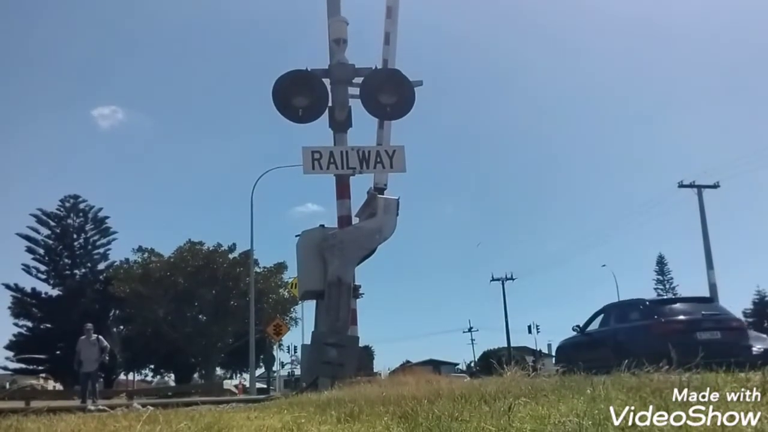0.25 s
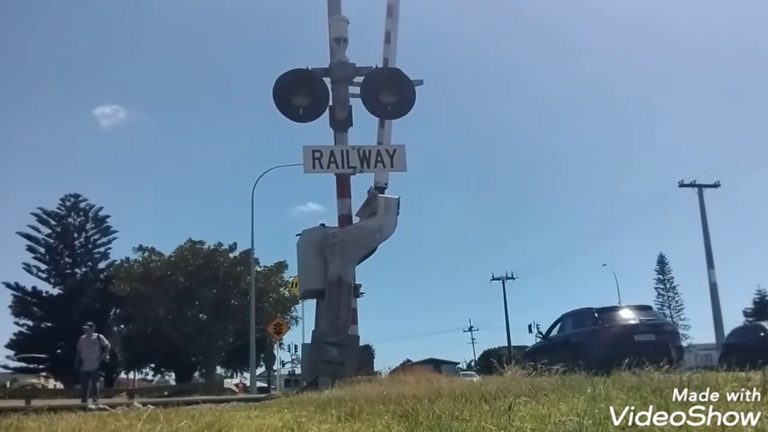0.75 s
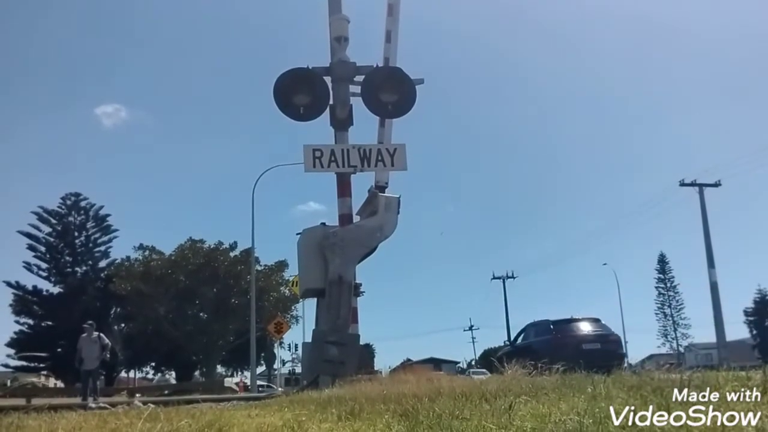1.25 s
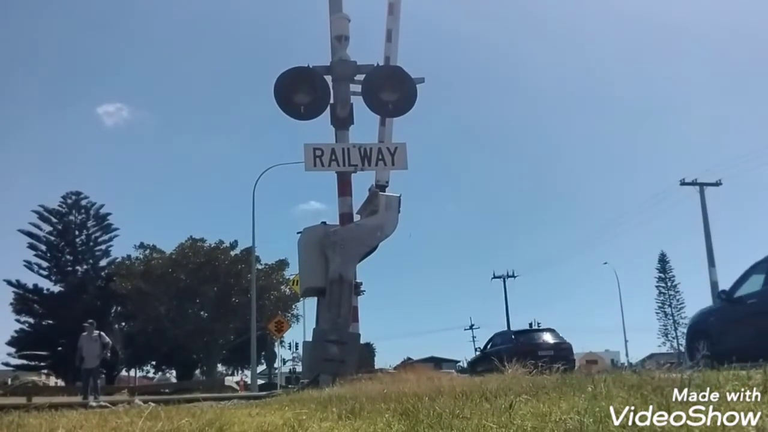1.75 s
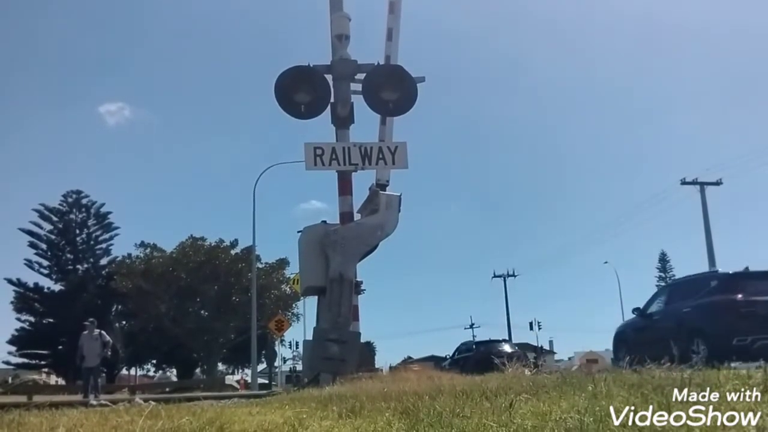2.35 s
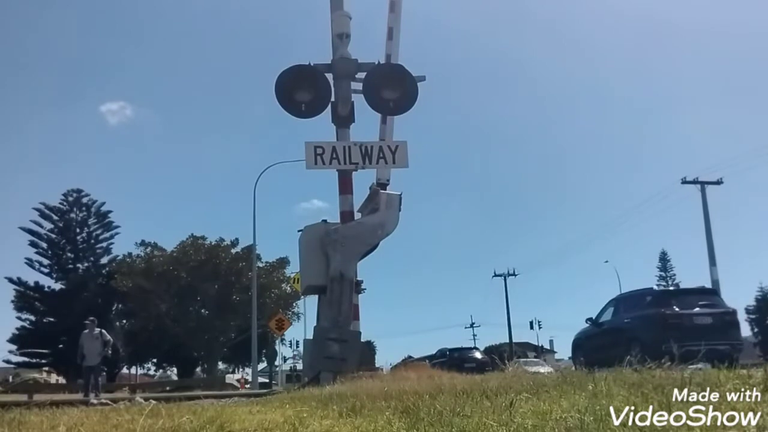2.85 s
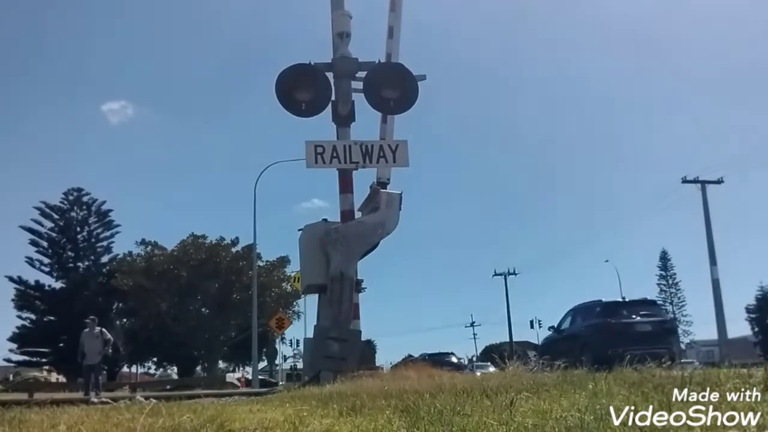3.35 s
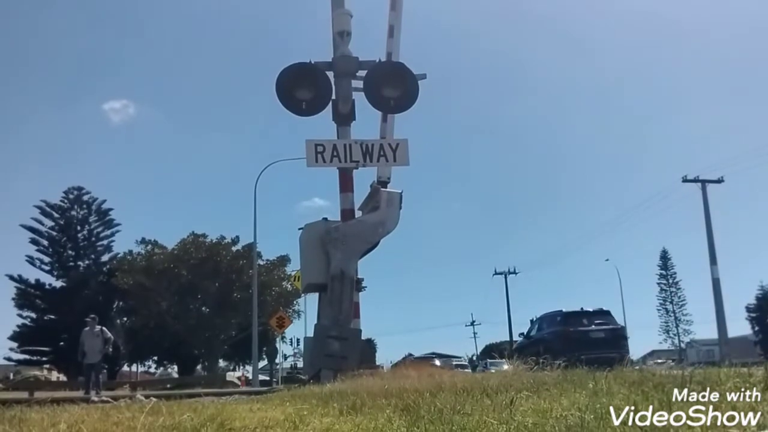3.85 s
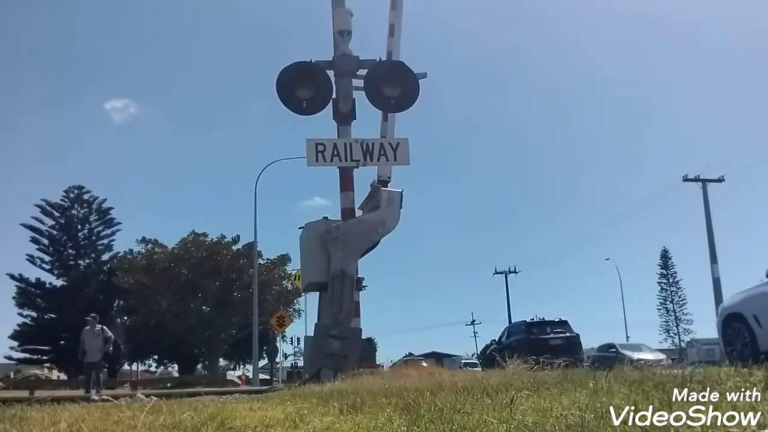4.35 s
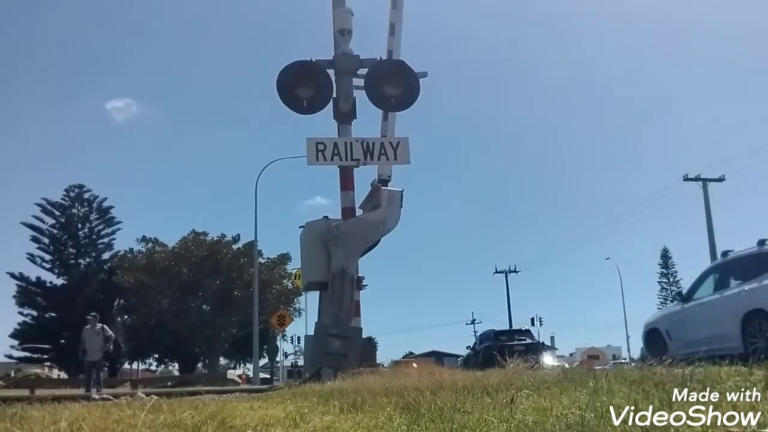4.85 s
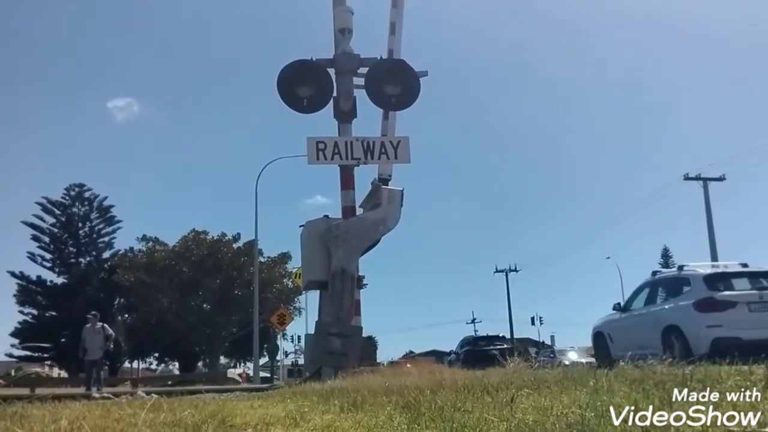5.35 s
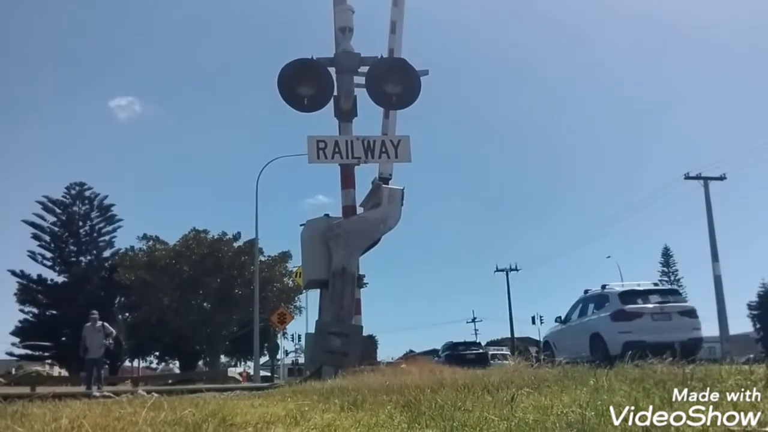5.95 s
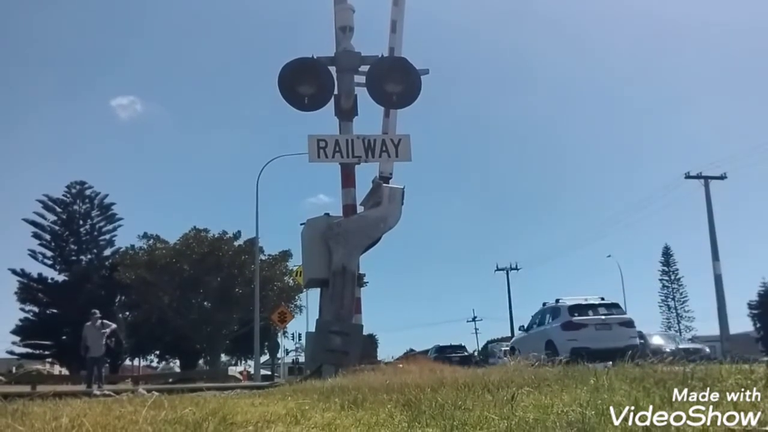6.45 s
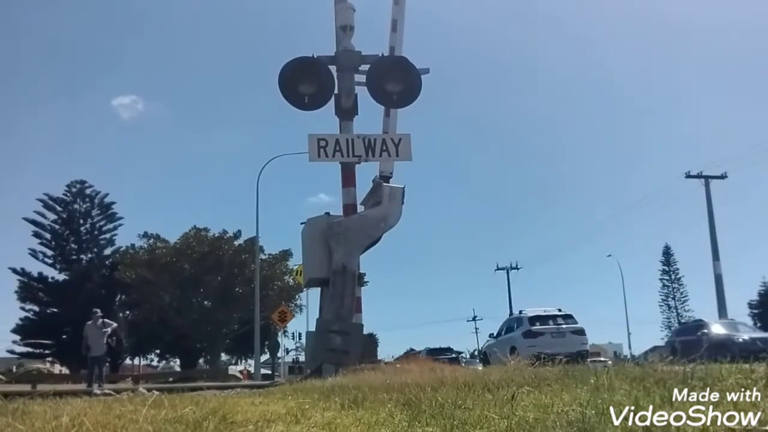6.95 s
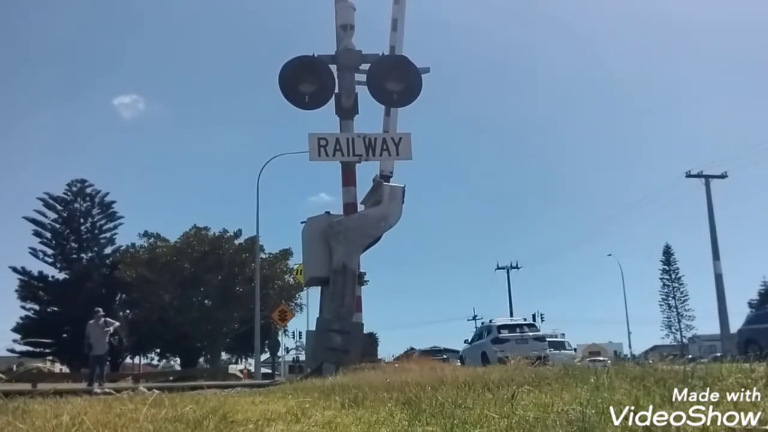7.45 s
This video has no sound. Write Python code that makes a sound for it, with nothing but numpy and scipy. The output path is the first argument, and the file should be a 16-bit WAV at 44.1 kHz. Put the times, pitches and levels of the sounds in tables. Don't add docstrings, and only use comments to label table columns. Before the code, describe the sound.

Cars roll slowly over a bumpy crossing as hoarse sparrows chirp and insects hiss, then one big engine revs up deep and drops back.

```python
import sys
import numpy as np
from scipy import signal
from scipy.fft import rfft, irfft
from scipy.io import wavfile
from scipy.ndimage import uniform_filter1d

SR = 44100
rng = np.random.default_rng(int(sys.argv[2]) if len(sys.argv) > 2 else 0)


def dump(signal):
    limited = np.clip(np.atleast_2d(signal).T, -1, 1)
    pcm = np.round(limited * 32767).astype(np.int16)
    wavfile.write(sys.argv[1], SR, pcm)


def gain_from_db(level_db):
    decades = np.asarray(level_db, float) / 20
    return 10 ** decades


N = 338688
HZ = np.arange(N // 2 + 1) * SR / N + 1e-3
TIME = np.arange(N) / SR


def level(x, db):
    return x * gain_from_db(db) / np.sqrt(np.mean(x ** 2))


def across(table, column):
    rows = np.array(table, float)
    return np.interp(np.log(HZ), np.log(rows[:, 0]), rows[:, column])


def curves(table):
    s, *columns = np.transpose(table)
    return [np.interp(TIME, s, c) for c in columns]


def walk(rate):
    hold = int(SR / rate)
    steps = np.repeat(rng.standard_normal(N // hold + 1), hold)
    return 1.3 * uniform_filter1d(uniform_filter1d(steps, hold), hold)[:N]


def resonance(hz, width):
    return 1j * HZ * width / (hz ** 2 - HZ ** 2 + 1j * HZ * width)


def ports(shared, other):
    # (frequency [Hz], left minus right [dB], coherence [0-1])
    port_response = [(60, 2.5, .99), (303, 4.5, 1), (700, 2.5, 0.91), (2210, 2.5, 0.56), (3170, 2, 0.75),
                     (4400, -2.5, 0), (5840, -10.5, 0), (6900, -7, 0.54), (8140, -1, 0.8), (9200, 2.5, 1),
                     (10700, 3, 0.82), (13000, 15, 0.8), (15500, 19, 0.5)]
    lag_s, lag_top_hz = 0.00023, 4950
    like = np.clip(across(port_response, column=2), 0, 1)
    tilt = gain_from_db(across(port_response, column=1) / 2)
    lag = np.exp(-2j * np.pi * HZ * lag_s * (HZ < lag_top_hz))
    left = shared * lag * tilt
    right = (like * shared + np.sqrt(1 - like ** 2) * other) / tilt
    return np.array([left, right]) * 2 / (tilt + 1 / tilt)


def wash(colour, db, anchors_hz, levels_db, flicker_db, flicker_rate, step):
    low, high = np.log2([colour[0][0], colour[-1][0]])
    pair = ports(*rfft(rng.standard_normal((2, N)))) * gain_from_db(across(colour, column=1))
    pair = pair * gain_from_db(db) / np.sqrt(2 * np.sum(abs(pair.mean(axis=0)) ** 2) / N ** 2)
    swells = np.array([v - 10 * np.log10(np.mean(gain_from_db(2 * v))) for v in levels_db])
    out = 0
    for octave in np.arange(low, high + step, step):
        window = np.clip(1 - abs(np.log2(HZ) - octave) / step, 0, 1)
        share = [np.interp(octave, np.log2(anchors_hz), one) for one in np.eye(len(anchors_hz))]
        swell_db = share @ swells + flicker_db * walk(flicker_rate)
        out = out + gain_from_db(swell_db) * irfft(pair * window, N)
    return out


def streaks(x, depth_db, width_hz, hold_s):
    size = 1024
    cells = signal.stft(x, nperseg=size)[2]
    field = rng.standard_normal(cells.shape[1:])
    field = uniform_filter1d(field, max(int(width_hz * size / SR), 1), axis=0)
    field = uniform_filter1d(field, max(int(hold_s * 2 * SR / size), 1), axis=1)
    return signal.istft(cells * gain_from_db(depth_db * field / field.std()), nperseg=size)[1][:, :N]


def heat():
    # (time [s], low choir [dB], high choir [dB], leaves [dB])
    heat_swells = [(0.0, -65, -59, -59.5), (0.36, -61, -61, -61), (0.9, -64.5, -63, -61),
                   (1.11, -59, -59, -57), (1.84, -59, -56, -53), (1.99, -63, -60, -61),
                   (2.2, -61.5, -55.5, -57), (2.27, -58, -53.5, -58), (2.46, -60.5, -59, -59.5),
                   (2.57, -58.5, -54.5, -62), (2.69, -59.5, -60, -65.5), (3.04, -65.5, -58, -66),
                   (3.21, -69.5, -68.5, -69), (3.29, -60, -56, -56.5), (3.36, -63.5, -57, -59),
                   (3.42, -61.5, -56, -65), (3.72, -57.5, -57, -58.5), (4.04, -63, -56, -66),
                   (4.51, -68, -69, -74), (4.56, -70, -68, -70.5), (4.62, -66, -62, -54),
                   (4.66, -72, -63, -66), (4.77, -60, -68, -71), (5.05, -73.5, -68.5, -73),
                   (5.13, -70, -68.5, -73.5), (5.2, -69, -66.5, -63.5), (5.37, -66, -63.5, -74.5),
                   (5.88, -65, -68.5, -68.5), (6.05, -63.5, -65.5, -59.5), (6.59, -62, -62, -69),
                   (6.61, -57, -65, -65), (6.74, -61, -61, -63), (7.42, -59, -63.5, -71),
                   (7.68, -57, -66.5, -70)]
    # (frequency [Hz], density [dB per Hz])
    hiss_spectrum = [(1350, -14), (2300, -6.5), (2570, -2), (2810, -8.5), (3350, -4.5), (4170, -8.5),
                     (4370, -3), (4970, -3.5), (6080, 3.5), (6530, 0.5), (7130, 1.5), (7980, -2.5),
                     (10900, 1), (13900, -3), (15700, -7)]
    hiss = wash(hiss_spectrum, -55.3, [6300, 10000, 13500], curves(heat_swells),
                flicker_db=1.7, flicker_rate=40, step=1 / 5)
    return streaks(hiss, depth_db=3.2, width_hz=140, hold_s=.3)


def tree_echoes(song):
    age = TIME[:SR // 2]
    tails = rng.standard_normal((2, len(age))) * np.exp(-age * np.log(1000) / 0.23)
    tails = tails / np.sqrt(np.sum(tails ** 2, axis=1, keepdims=True))
    wet = signal.fftconvolve(song[None], tails, axes=1)[:, :N]
    direct_gain = gain_from_db(np.array([[-2.5], [1.5]]))
    echo_gain = gain_from_db(np.array([[-1.5], [1.5]]))
    return gain_from_db(-0.5) * (song * direct_gain + echo_gain * wet)


def sparrows():
    # (time [s], pitch [Hz], level [dB])
    chirps = [
        [(0.405, 4270, -61), (0.491, 4160, -49), (0.534, 4090, -71)],
        [(0.75, 4420, -68), (0.762, 4410, -57.5), (0.811, 4300, -62)],
        [(0.828, 3460, -65), (0.834, 3470, -58), (0.869, 3740, -64)],
        [(1.048, 4110, -71), (1.054, 4140, -59), (1.091, 4100, -68)],
        [(1.311, 4530, -62.5), (1.319, 4540, -57.5), (1.406, 4220, -65.5)],
        [(1.405, 4140, -62), (1.435, 4370, -60.5), (1.466, 4450, -66)],
        [(1.546, 4280, -65), (1.568, 4280, -59), (1.649, 3930, -65)],
        [(1.668, 4010, -65), (1.684, 3970, -60), (1.735, 3780, -67.5)],
        [(1.884, 4520, -65), (1.928, 4370, -55), (1.971, 3940, -67.5)],
        [(1.974, 3630, -66.5), (1.984, 3650, -58), (2.016, 3670, -65)],
        [(2.442, 4000, -63), (2.516, 3745, -64), (2.57, 4580, -60), (2.608, 3930, -58.5), (2.723, 4350, -65)],
        [(3.115, 4650, -61), (3.161, 4400, -57), (3.283, 3940, -63), (3.321, 3700, -59)],
        [(3.63, 4390, -64), (3.646, 4370, -59), (3.709, 4200, -69)],
        [(3.72, 3660, -68), (3.834, 4280, -48), (3.86, 4060, -65), (3.926, 3620, -60), (3.978, 3750, -66)],
        [(4.288, 4320, -62), (4.306, 4370, -59), (4.363, 4330, -65)],
        [(4.504, 4170, -65), (4.518, 4170, -55), (4.565, 4110, -66)],
        [(4.657, 4870, -63), (4.675, 4910, -56), (4.7, 4900, -68)],
        [(4.713, 3930, -65), (4.719, 3910, -61), (4.752, 3890, -65)],
        [(4.751, 4140, -65), (4.761, 4110, -60), (4.794, 3780, -64)],
        [(4.907, 4120, -66), (4.935, 4120, -50), (4.974, 4100, -73)],
        [(5.3, 4340, -64), (5.336, 4290, -55), (5.375, 3910, -66)],
        [(5.48, 4570, -60), (5.548, 4060, -61), (5.58, 3740, -68)],
        [(5.619, 4070, -62), (5.637, 3990, -57), (5.66, 3840, -66)],
        [(5.992, 4150, -65), (6.054, 3720, -59), (6.097, 3790, -67)],
        [(6.256, 4290, -73), (6.27, 4190, -53), (6.34, 3940, -54), (6.414, 3630, -66)],
        [(6.497, 4410, -64.5), (6.521, 4550, -52), (6.615, 3932, -59), (6.664, 4640, -60)],
        [(7.012, 4740, -67), (7.018, 4750, -64), (7.085, 5020, -64)],
        [(7.088, 4485, -65), (7.116, 4480, -58), (7.197, 3870, -63)],
        [(7.635, 4120, -67), (7.653, 4140, -53), (7.68, 4110, -54)],
    ]
    # (time [s], pitch [Hz], level [dB])
    churrs = [
        [(0.382, 3520, -71), (0.504, 3730, -56), (0.535, 3560, -74)],
        [(0.821, 3410, -67), (0.851, 3340, -61), (0.88, 3320, -75)],
        [(1.557, 3720, -68), (1.619, 3530, -66), (1.738, 3450, -66)],
        [(1.931, 3500, -66), (1.981, 3490, -61), (2.033, 3580, -70)],
        [(2.449, 3670, -68), (2.455, 3540, -66), (2.651, 3520, -60.5), (2.752, 3450, -68)],
        [(3.136, 3580, -77), (3.148, 3570, -58.5), (3.358, 3340, -66), (3.374, 3380, -81)],
        [(3.647, 3280, -71), (3.723, 3340, -61), (3.959, 3493, -63.5), (3.993, 3510, -75)],
        [(4.361, 3150, -65), (4.371, 3180, -66), (4.418, 3176, -75)],
        [(4.726, 3700, -69), (4.794, 3680, -66.5), (4.815, 3650, -66)],
        [(4.932, 3570, -80), (4.938, 3480, -63), (5.011, 3130, -67)],
        [(5.343, 3760, -67), (5.385, 3750, -68), (5.402, 3750, -67)],
        [(5.534, 3710, -63), (5.546, 3710, -60.5), (5.583, 3650, -70)],
        [(5.628, 3470, -64), (5.64, 3530, -64), (5.685, 3520, -67)],
        [(6.013, 3640, -64), (6.025, 3640, -61), (6.124, 3480, -70)],
        [(6.273, 3660, -64), (6.315, 3650, -57), (6.469, 3390, -71)],
        [(6.546, 3550, -76), (6.556, 3560, -60), (6.663, 3410, -72)],
        [(7.133, 3670, -69), (7.155, 3640, -62), (7.281, 3470, -74)],
    ]
    song = np.zeros(N)
    trill = signal.sawtooth(2 * np.pi * np.cumsum(34 + 7 * walk(12)) / SR, .75) + .5 * walk(220)
    throb = walk(150)
    hoarse = (1.7 + walk(600)) / 1.9
    for call in chirps + churrs:
        hz, db = curves(call)
        edge = np.clip(np.minimum(TIME - call[0][0], call[-1][0] - TIME) / 0.012 + 1, 0, 1)
        hz = hz + np.clip(.45 * (4550 - hz), 70, 400) * trill
        song += edge * gain_from_db(db + 2.56 * throb) * hoarse * np.sin(2 * np.pi * np.cumsum(hz) / SR)
    return tree_echoes(song)


def scratches(events):
    out = 0
    for s, db, hz, rise, fall in events:
        shape = np.exp(np.minimum((TIME - s) / rise, (s - TIME) / fall))
        scratch = rng.standard_normal((2, N)) * gain_from_db(3.3 * walk(400)) * shape
        out = out + gain_from_db(db + 12) * ports(*rfft(scratch)) * resonance(hz, 0.38 * hz) ** 2
    return irfft(out, N)


def far_swishes():
    # (time [s], level [dB], centre [Hz], rise [s], fall [s])
    swish_events = [
        (4.4, -61, 1400, 0.28, 0.35),
        (4.35, -60, 1350, 0.17, 0.28),
        (7.2, -60, 1500, 0.089, .12),
        (3.7, -70, 2250, 0.24, .3),
        (.25, -60, 1050, .08, .15),
        (2.3, -60, 950, .05, .1),
        (5.62, -52, 560, .08, .15),
    ]
    return scratches(swish_events)


def grass():
    # (time [s], level [dB], centre [Hz], rise [s], fall [s])
    brush_events = [
        (2.064, -55, 13000, .004, .008),
        (2.27, -53, 6700, .01, 0.034),
        (2.37, -52.5, 6500, 0.012, 0.016),
        (3.28, -63.5, 7500, .01, 0.025),
        (4.613, -53, 12300, .007, .012),
        (.455, -62, 5100, .012, .02),
        (3.13, -62, 5000, .015, .02),
        (.89, -64, 4450, .012, .02),
        (5.2, -69, 13000, .01, 0.046),
        (5.75, -58.5, 6040, .005, .02),
    ]
    return scratches(brush_events)


def road():
    # (time [s], thud 30-100 Hz [dB], drone 100-200 Hz [dB])
    rumble = [
        [(0.0, -51, -47.5), (0.63, -51, -57.5), (0.83, -58, -47.5), (1.11, -64.5, -43), (1.59, -61.5, -40),
         (2.63, -56, -50), (3.13, -62.5, -56.5), (4.36, -52.5, -54.5), (4.61, -57, -61), (4.71, -61.5, -51.5),
         (4.92, -59, -61.5), (5.2, -51, -52), (5.82, -57.5, -51), (5.95, -50, -56)],
        [(7.52, -52, -60.5), (7.624, -53, -65), (7.68, -49, -62)],
    ]
    # (time [s], hum 200-450 Hz [dB], roar 450-2500 Hz [dB])
    tyre_swells = [(0.0, -57, -52), (0.06, -40.5, -59.5), (0.1, -52, -57), (0.19, -47.5, -58),
                   (0.43, -47, -53.5), (0.45, -45, -57), (0.64, -42.5, -53), (0.94, -46, -59),
                   (1.03, -48, -54), (1.11, -47, -59.5), (1.69, -48.5, -62.5), (2.39, -52.5, -56),
                   (2.57, -58.5, -64), (2.65, -49.5, -63), (3.01, -58, -61), (3.36, -56, -61.5),
                   (3.61, -59, -53), (3.66, -49, -57.5), (3.89, -54.5, -53), (5.2, -52, -58.5),
                   (5.39, -47.5, -51.5), (6.42, -52.5, -58), (6.46, -38.5, -53), (6.52, -43.5, -58.5),
                   (6.65, -45.5, -60), (7.04, -41.5, -56.5), (7.62, -49, -57), (7.68, -47.5, -52)]
    # (frequency [Hz], density [dB per Hz])
    road_spectrum = [(13, -71), (22, -19.5), (124, 1), (149, -4), (254, -4), (325, -12.5), (376, -13.5),
                     (434, -15), (544, -16), (711, -22.5), (929, -21), (1190, -27.5), (1350, -26.5),
                     (1870, -35.5), (3000, -40.5), (3900, -43), (6600, -120)]
    swells = curves(rumble[0] + rumble[1]) + curves(tyre_swells)
    roar = wash(road_spectrum, -44, [60, 140, 300, 900], swells, flicker_db=1.4, flicker_rate=14, step=1 / 3)
    return streaks(roar, depth_db=3.0, width_hz=90, hold_s=.1)


def rails():
    # (time [s], peak [dB], ring [Hz], decay to -60 dB [s])
    knocks = [(0.034, -49, 510, 0.064), (0.67, -49, 516, 0.07), (1.41, -60, 519, 0.07),
              (1.822, -51, 550, 0.076), (2.189, -50.5, 552, 0.075), (2.407, -46.5, 566, 0.07),
              (3.02, -53, 506, 0.062), (3.569, -51, 478, 0.07), (5.543, -43, 540, 0.07),
              (5.745, -49, 570, 0.07), (5.92, -54, 430, 0.076), (6.124, -43, 876, 0.061),
              (6.452, -44.5, 975, 0.07)]
    out = 0
    for s, db, hz, t60 in knocks:
        age = np.maximum(TIME - s, 0)
        fade = (1 - np.exp(-age / .0007)) * np.exp(-age * np.log(1000) / t60)
        crack = irfft(rfft(rng.standard_normal(N)) * resonance(1.2 * hz, 0.55 * hz) ** 2, N)
        ring = np.sin(2 * np.pi * hz * age)
        out = out + gain_from_db(db + 6) * fade * (ring + level(crack, -6.5))
    return out


def other_engines():
    # (start [s], end [s], start pitch [Hz], end pitch [Hz], level [dB])
    engine_notes = [
        (0.34, 1.13, 262, 250, -45),
        (1.03, 1.46, 365, 390, -51.5),
        (1.5, 2, 420, 385, -62),
        (1.304, 2.64, 122, 119.5, -47.5),
        (1.5, 2, 170, 165, -55),
        (2.3, 3.0, 92, 81, -50),
        (2.88, 4.1, 178, 172.3, -52.5),
        (6.79, 8, 430, 420, -58),
        (6.3, 6.7, 195, 170, -45.5),
        (6.35, 6.6, 270, 240, -50.5),
    ]
    out = 0
    for start, end, start_hz, end_hz, db in engine_notes:
        part = np.clip((TIME - start) / (end - start), 0, 1)
        hz = (start_hz + (end_hz - start_hz) * part) * (1 + 0.01487 * walk(14))
        swell = gain_from_db(db + 2.64 * walk(16)) * np.sin(np.pi * part) ** 0.37
        out = out + swell * np.sin(2 * np.pi * np.cumsum(hz) / SR)
    return out


def big_engine():
    # (time [s], firing rate [Hz], level [dB], octave level [dB])
    rev = [(5.8, 52.1, -63, -57), (5.96, 54.6, -58, -58), (6.04, 52.4, -48, -50), (6.19, 53.85, -43, -46),
           (6.4, 64.1, -32.5, -45), (6.606, 73.94, -26, -34.5), (6.796, 80.1, -25.5, -31.5),
           (6.852, 80.7, -24.5, -40.5), (7.088, 83.2, -27.5, -45.5), (7.202, 78, -28.5, -34),
           (7.6, 55.5, -56.5, -59)]
    # (multiple of the firing rate [1], relative level [dB])
    exhaust = [(.625, -23.5), (0.876, -22), (1.125, -15), (1.375, -11.5), (1.625, -13.5), (1.875, -23),
               (2.375, -26)]
    hz, db, octave_db = curves(rev)
    turns = 2 * np.pi * np.cumsum(hz * (1 + 0.00587 * walk(25))) / SR
    out = gain_from_db(db + .8 * walk(20)) * np.sin(turns)
    out = out + gain_from_db(octave_db + 1.9 * walk(18)) * np.sin(2 * turns + 2.04)
    for multiple, order_db in exhaust:
        line = np.sin(multiple * turns + 2 * np.pi * rng.random())
        out = out + gain_from_db(db + order_db + 3.36 * walk(14)) * line
    edge = np.clip(np.minimum(TIME - rev[0][0], rev[-1][0] - TIME) / 0.14, 0, 1)
    return np.sqrt(2) * edge * out


def scene():
    background = heat() + sparrows() + far_swishes() + grass() + road()
    cars = rfft(rails() + other_engines() + big_engine())
    return background + irfft(ports(cars, 1j * cars), N)


def roll_off(x):
    return signal.sosfilt(signal.butter(12, 15790, fs=SR, output="sos"), x)


def record(dry):
    return roll_off(dry)


dry = scene()
out = record(dry)
dump(out)
```